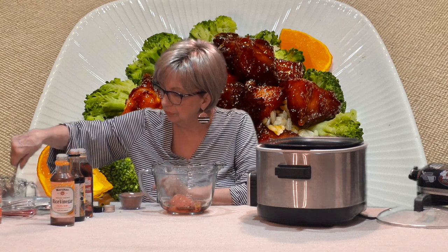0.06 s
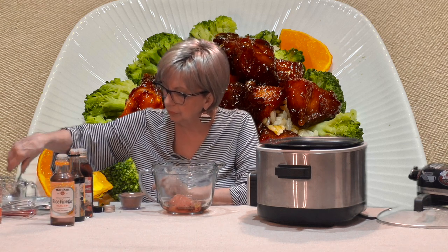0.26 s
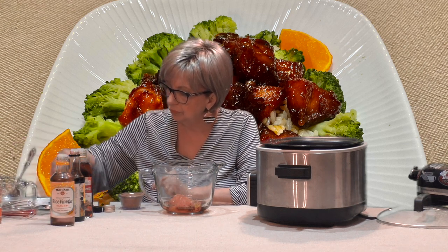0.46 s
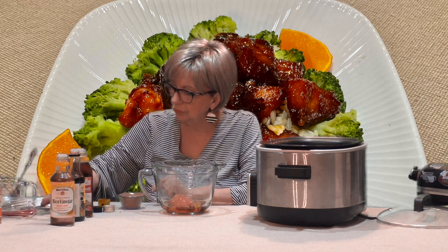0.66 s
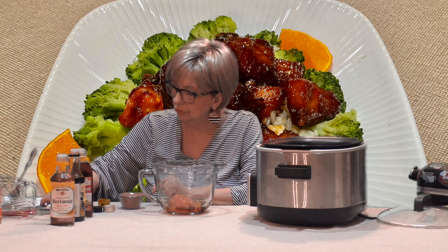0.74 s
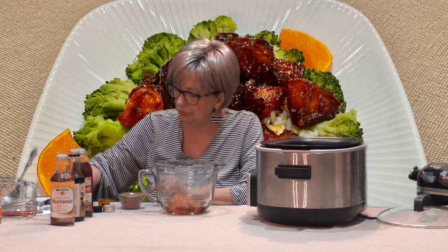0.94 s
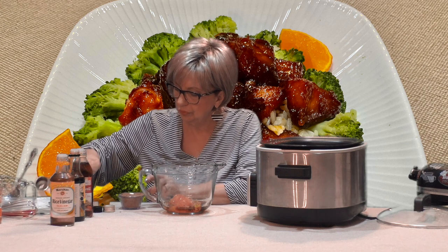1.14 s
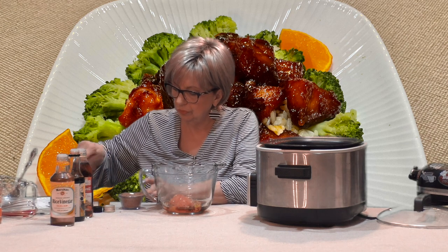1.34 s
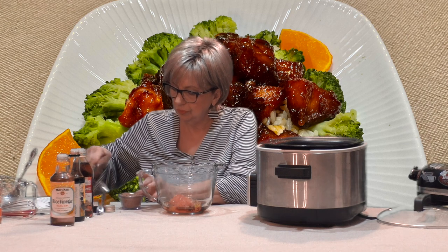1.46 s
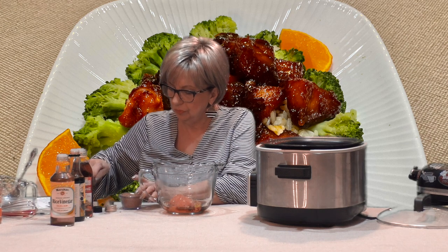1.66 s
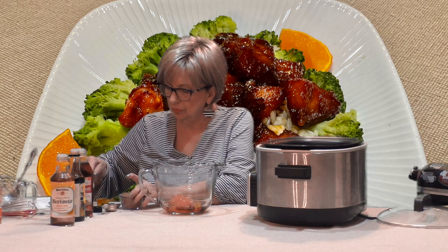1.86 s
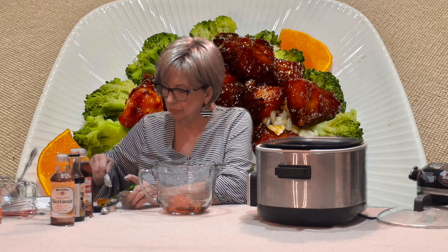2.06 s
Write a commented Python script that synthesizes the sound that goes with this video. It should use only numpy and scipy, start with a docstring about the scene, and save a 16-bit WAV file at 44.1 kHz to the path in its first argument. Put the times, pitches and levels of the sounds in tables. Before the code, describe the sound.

Metal spoons clinking: one rattles to rest in glass, others scrape, knock and ring among dishes

```python
"""Spoons in a kitchen

A spoon drops back into a glass jar on a counter and rattles to rest: filtered noise ticks over decaying modes.
Steel measuring spoons slide (granular friction noise), clack and ring among the dishes (damped modes), then settle.
Decaying stereo noise convolved with each contact gives the kitchen's echoes; a fan hums and rushes underneath."""
import sys
import numpy as np
from scipy import signal
from scipy.fft import rfft, irfft, next_fast_len
from scipy.io import wavfile
from scipy.ndimage import map_coordinates

SR = 44100
rng = np.random.default_rng(int(sys.argv[2]) if len(sys.argv) > 2 else 0)


def pcm_store(signal):
    """Save signal as 16-bit PCM."""
    levels = np.round(np.clip(np.atleast_2d(signal), -1, 1) * 32767)
    wavfile.write(sys.argv[1], SR, levels.astype(np.int16).T)


N = 92610  # length [samples]
BURST_S = 0.08  # length of each contact's noise [s]


def amp(db):
    """Level definition: decibels to an amplitude gain."""
    return 10 ** (np.asarray(db) / 20)


def unit(x):
    """Power normalization: scale to rms 1."""
    return x / np.sqrt(np.mean(x ** 2) + 1e-20)


def along(points, hz):
    """Logarithmic interpolation: read (frequency [Hz], value) points on a log-frequency axis."""
    f, v = np.transpose(points)
    return np.interp(np.log(hz + 1), np.log(f + 1), v)


def wobble(rate):
    """Random modulation: a smooth curve through random knots, rate knots a second."""
    return map_coordinates(rng.standard_normal(200), [np.arange(N) * rate / SR], mode="wrap")


def filtered(x, gain):
    """Minimum-phase filtering: the folded cepstrum makes the given gain(hz) causal."""
    n = x.shape[-1]
    m = 2 * next_fast_len(n // 2 + 4096)
    log_gain = np.log(np.maximum(gain(np.fft.rfftfreq(m, 1 / SR)), 1e-6))
    cepstrum = irfft(log_gain, m)
    cepstrum[..., 1:m // 2] *= 2
    cepstrum[..., m // 2 + 1:] = 0
    response = np.exp(rfft(cepstrum))
    return irfft(rfft(x, m) * response, m)[..., :n]


def soft(hz, corner_hz):
    """Contact stiffness: a softer contact loses the treble above its corner."""
    return 1 / np.sqrt(1 + (hz / corner_hz) ** 4)


def peak(hz, centre_hz, half_width_hz):
    """Resonance curve: 1 at the centre, 1/2 at the half-width."""
    return 1 / (1 + ((hz - centre_hz) / half_width_hz) ** 2)


def pair(alike, size):
    """Interchannel coherence: mixing mid and side noise makes two sides partly alike."""
    likeness = along(alike, np.fft.rfftfreq(size, 1 / SR))
    turn = np.arccos(np.clip(likeness, 0, 0.999)) / 2
    spectra = rfft(rng.standard_normal((2, size))) * [np.cos(turn), np.sin(turn)]
    mid, side = irfft(spectra, size)
    return np.array([mid + side, mid - side])


def add(track, s, sound):
    """Superposition: mix a sound into the track at s seconds."""
    part = track[:, round(s * SR):][:, :sound.shape[-1]]
    part += sound[..., :part.shape[-1]]


def burst(colour, t60, t):
    """Transient noise: exponentially decaying noise with the given spectrum, normalized to rms gain 1."""
    gain = lambda hz: unit(amp(along(colour, hz)))
    return filtered(rng.standard_normal(len(t)) * amp(-60 * t / t60), gain)


RING_ATTACK_S = 0.000063  # time constant
FLUTTER_HZ = 49.92  # knots per second: a loose, chattering contact makes each ring waver


def ring(hz, t60, times, levels_db, flutter_db, wander_rad):
    """Modal superposition: every blow adds to one decaying mode whose level and phase may waver."""
    kicks = np.bincount(np.round(times * SR).astype(int), amp(levels_db), minlength=N)[:N]
    decay, rise = amp(-60 / (t60 * SR)), np.exp(-1 / (RING_ATTACK_S * SR))
    level = signal.lfilter([1 - rise], np.poly([decay, rise]), kicks)
    flutter = amp(flutter_db * wobble(FLUTTER_HZ))
    phase = 2 * np.pi * hz * np.arange(N) / SR + wander_rad * wobble(FLUTTER_HZ)
    return level * flutter * np.sin(phase)


# left-right likeness of the echoes: (frequency [Hz], likeness [0-1])
ECHO_LIKENESS = [(500, 0.47), (2000, 0.59), (4000, 0.63), (7000, 1), (12000, 0.94)]
# reverberation time of the kitchen: (frequency [Hz], t60 [s])
KITCHEN_DECAY = [(300, 0.83), (2000, 0.47), (4000, 0.33), (8000, 0.36), (15000, 0.17)]
WALL_DELAY_S, WALL_BUILD_S = 0.0024, 0.001  # first echo, and the linear build-up after it


def kitchen(x):
    """Statistical reverberation: convolution with decaying stereo noise whose treble dies first."""
    hz, t, z = signal.stft(pair(ECHO_LIKENESS, size=SR // 2), SR, nperseg=256)
    decay = amp(-60 * t / along(KITCHEN_DECAY, hz)[:, None])
    tail = signal.istft(z * decay, SR, nperseg=256)[1]
    tail_t = np.arange(tail.shape[1]) / SR
    tail = tail * np.clip((tail_t - WALL_DELAY_S) / WALL_BUILD_S, 0, 1)
    tail = tail / np.linalg.norm(tail[0])  # the left tail has unit energy
    return signal.fftconvolve(x[None], tail, axes=1)[:, :N]


# spectrum of the rushing air: (frequency [Hz], relative density [dB])
AIR_COLOUR = [(20, -27), (45, -3.5), (70, 0), (100, 2.5), (170, -1), (260, -0.5), (390, 1), (480, -3.5),
              (620, -13.5), (800, -17.5), (1000, -11), (1500, -12), (2200, -17), (3500, -22), (6000, -31),
              (10000, -27), (15500, -25.5)]
# left-right likeness of the air: (frequency [Hz], likeness [0-1])
AIR_LIKENESS = [(40, 1), (150, 0.46), (350, 0.91), (2000, 0.42), (8000, 0.82)]
# lines of the fan: (frequency [Hz], rms level before wavering [dB])
FAN_LINES = [(366, -55.5), (425.5, -51.5)]
AIR_DB = -41.5  # rms


def fan():
    """Broadband flow noise with tonal lines: low rush, faint hiss and two slightly unsteady tones."""
    t = np.arange(N) / SR
    air = unit(filtered(pair(AIR_LIKENESS, size=N), lambda hz: amp(along(AIR_COLOUR, hz))))
    hum = np.zeros(N)
    for hz, db in FAN_LINES:
        level = np.sqrt(2) * amp(db + 4.4 * wobble(rate=7.6))
        hum += level * np.sin(2 * np.pi * hz * t + 0.5 * wobble(rate=8.23))
    return amp(AIR_DB) * air + hum


# spoon rubbing on glass, a faint hollow note: (centre time [s], Gaussian length [s], level [dB], pitch [Hz])
RUBS = [(0.05, 0.03, -42.5, 1007), (0.13, 0.022, -38, 1018), (0.392, 0.01, -41, 980),
        (0.493, 0.013, -35.5, 990), (0.58, 0.041, -48.5, 960), (0.767, 0.048, -46.5, 937),
        (0.913, 0.0092, -43, 1014)]
RUB_HALF_WIDTH_HZ = 45


def rubbing():
    """Frictional excitation of a resonance: narrow noise swells as the spoon drags on the glass."""
    t = np.arange(N) / SR
    out = np.zeros(N)
    for s, length, db, pitch_hz in RUBS:
        note = filtered(rng.standard_normal(N), lambda hz: peak(hz, pitch_hz, RUB_HALF_WIDTH_HZ))
        out += unit(note) * amp(db) * np.exp(-((t - s) / length) ** 2)
    return out


# spoon against jar: (time [s], glass ring [dB], spoon ring [dB], tick [dB], treble corner [Hz],
# place [0 bottom to 1 rim])
JAR_BLOWS = [(0.1152, -29, -32.5, -24, 4380, 0), (0.1185, -46, -22, -21, 10000, 0.15),
             (0.2768, -15.5, -38, -12.5, 12000, 0.12), (0.2795, -16.5, -40, -10, 14200, 0.14),
             (0.2915, -23.5, -49, -27, 15000, 0), (0.301, -32, -32, -15.5, 10000, 0),
             (0.312, -32, -37, -24, 5160, .2), (0.363, -40, -42, -36, 5060, 1),
             (0.378, -30, -26.5, -37, 7000, 0.9), (0.421, -41, -60, -28.5, 5000, 0),
             (0.481, -44, -37, -37, 5900, 0.99), (0.565, -36.5, -65, -30.5, 4930, 1),
             (0.571, -37, -36.5, -31, 4900, 1)]
# modes of the glass jar: (frequency [Hz], level struck at bottom [dB], level struck at rim [dB], t60 [s])
JAR_MODES = [(1010, -10, -8, 0.059), (2062, 0.5, -13, 0.25), (2114, -7, -18, 0.41), (2143, -13, -9, .28),
             (2650, -19, 4, 0.14), (2680, -18, -6.5, 0.24), (3601, -16, -20, 0.34), (4745, -13, -3, 0.098),
             (5372, -9, -17, 0.4), (5910, -16, -6, 0.27), (6470, -17, -29, 0.21), (7360, -13.5, -27, 0.22),
             (8253, -7, -18, 0.24), (9580, -7, -10, 0.14), (10090, 5.5, -16, 0.052),
             (10240, -6.5, -28, 0.16), (11200, -15.5, -14, 0.25), (12630, -15, -22, 0.2),
             (14500, -12, -26, .15)]
# modes of the spoon in the jar: (frequency [Hz], level [dB], t60 [s])
SPOON_MODES = [(1730, -16, 0.42), (2262, -6.5, 0.19), (2285, 6.5, 0.06), (2976, -4, 0.13), (5370, -5, 0.32),
               (3506, -10, .25), (4700, -10, 0.11), (6560, -17, 0.16), (9400, -21, 0.14), (11500, -19, 0.1),
               (12680, -4, 0.033)]
# spectrum of steel ticking on glass: (frequency [Hz], relative level [dB])
TICK_COLOUR = [(100, -50), (400, -29), (740, -16.5), (980, -5.5), (1500, -1.5), (2200, 8), (3200, 3),
               (4200, 0.5), (5400, 6.5), (7200, -6.5), (10000, -8), (12500, -2), (15500, -13)]
TICK_T60_S = 0.026
TICK_PEAK_DB, TICK_HALF_WIDTH_HZ = 1.5, 98  # the glass and the spoon colour the tick around their modes


def jar(tick_room_db, ring_room_db):
    """Modal excitation: contacts tick and ring glass and spoon; the place struck weights the glass modes."""
    out, t = np.zeros((2, N)), np.arange(int(BURST_S * SR)) / SR
    times, glass_db, spoon_db, ticks_db, corners_hz, place = np.transpose(JAR_BLOWS)
    for s, db, corner_hz in zip(times, ticks_db, corners_hz):
        noise = burst(TICK_COLOUR, TICK_T60_S, t)
        tick = amp(db) * filtered(noise, lambda hz: soft(hz, corner_hz) * tick_colour(hz))
        add(out, s, tick)
        add(out, s, amp(tick_room_db) * kitchen(tick))
    dull_db = lambda hz: 20 * np.log10(soft(hz, corners_hz))
    rings = np.zeros(N)
    for hz, bottom_db, rim_db, t60 in JAR_MODES:
        levels_db = glass_db + np.interp(place, [0, 1], [bottom_db, rim_db]) + dull_db(hz)
        rings += ring(hz, t60, times, levels_db, flutter_db=3, wander_rad=1.0)
    for hz, db, t60 in SPOON_MODES:
        rings += ring(hz, t60, times, spoon_db + db + dull_db(hz), flutter_db=1, wander_rad=0.97)
    return out + rings + amp(ring_room_db) * kitchen(rings)


def tick_colour(hz):
    """Resonant radiation: the tick keeps full level at jar and spoon modes and loses a little between."""
    modes_hz = np.array([row[0] for row in JAR_MODES + SPOON_MODES])
    near = np.max(peak(hz, modes_hz[:, None], TICK_HALF_WIDTH_HZ), axis=0)
    return amp(TICK_PEAK_DB * (near - 1.0))


# measuring spoons knocking: (time [s], clack [dB], bright scrape [dB], clack pitch [Hz])
CLACKS = [(0.628, -19.5, -28, 4364), (0.633, -20.5, -33, 4316), (1.514, -9, -49, 3430),
          (1.5175, -20, -28, 3240), (1.5274, -10.5, -42, 3230), (1.529, -21, -40, 3610),
          (1.535, -6.5, -15.5, 3384), (1.5375, -21, -14.5, 3280), (1.5424, -15.5, -30, 3660),
          (1.555, -41, -43, 3400), (1.569, -27, -35, 3370), (1.582, -38, -23.5, 3430),
          (1.711, -17.5, -40, 2820), (1.7157, -7, -23.5, 3466), (1.7392, -15.5, -34, 3380),
          (1.777, -27, -53, 3600), (1.821, -16, -36, 3114), (1.9857, -22, -38, 3280),
          (2.0386, -22.5, -40.5, 3240)]
# short resonances of the clack: (ratio to its pitch, level [dB], t60 [s])
CLACK_BODY = [(.39, -37, 0.013), (.56, -15, 0.017), (.82, -13, 0.0047), (0.942, -1.5, 0.017),
              (1.029, 3.5, 0.018), (1.129, -2.5, 0.018), (1.36, -15.5, 0.023)]
# spectrum of the clack's noise: (frequency [Hz], relative level [dB])
CLACK_NOISE = [(800, -15), (1150, -5), (2300, 3.5), (3600, 6), (5000, -7), (8000, -20.5), (15500, -35)]
# spectrum of the bright scrape: (frequency [Hz], relative level [dB])
SCRAPE_COLOUR = [(300, -37), (1000, -1), (2500, -5.5), (4400, 6), (5600, 1), (7400, -2), (11000, -2),
                 (15500, -5.5)]
# small steel parts radiate little bass: (frequency [Hz], gain [dB])
LOW_CUT = [(100, -30), (500, -12), (820, -9.5), (1120, 1)]
CLACK_NOISE_DB = -1.5  # noise gain beside the body
CLACK_ATTACK_S, CLACK_T60_S, SCRAPE_T60_S = 0.00048, 0.022, 0.026  # attack is a time constant


def clacks(clack_room_db, scrape_room_db):
    """Impact of small bodies: heavily damped resonances and noise, with a short bright scrape."""
    out, t = np.zeros((2, N)), np.arange(int(BURST_S * SR)) / SR
    contact = 1 - np.exp(-t / CLACK_ATTACK_S)
    thin = lambda hz: amp(along(LOW_CUT, hz))
    for s, clack_db, scrape_db, pitch_hz in CLACKS:
        body = np.zeros(len(t))
        for ratio, db, t60 in CLACK_BODY:
            level = amp(db + 0.76 * rng.standard_normal() - 60 * t / t60)  # each knock varies a little
            body += level * np.sin(2 * np.pi * ratio * pitch_hz * t)
        noise = amp(CLACK_NOISE_DB) * burst(CLACK_NOISE, CLACK_T60_S, t)
        clack = amp(clack_db) * filtered(contact * (body + noise), thin)
        scrape = amp(scrape_db) * filtered(burst(SCRAPE_COLOUR, SCRAPE_T60_S, t), thin)
        add(out, s, clack + scrape)
        add(out, s, kitchen(amp(clack_room_db) * clack + amp(scrape_room_db) * scrape))
    return out


# blows that leave the measuring spoons ringing: (time [s], level [dB], treble corner [Hz])
STEEL_BLOWS = [(0.628, -34, 20200), (1.538, -14.5, 15000), (1.567, -19.5, 5500), (1.7165, -26, 12000),
               (1.983, -36, 3980), (2.04, -41, 3580)]
# modes of the measuring spoons: (frequency [Hz], level [dB], t60 [s])
STEEL_MODES = [(2770, -14, 0.14), (3366, -1.5, 0.44), (3330, -21, 0.13), (4080, -7, 0.46),
               (4720, -15, 0.17), (5900, -25, 0.67), (7235, -14.5, 0.51), (9255, -7, 0.26),
               (10810, 2, 0.044)]
# fingers damp the ringing until the next knock: the level ramps down, holds, then ramps back up
GRIP_S, GRIP_END_S, GRIP_DB, GRIP_DB_PER_S = 1.63, 1.716, 6, 300


def steel_ring(room_db):
    """Free vibration of steel: a clear modal ring, lowered in level while the spoons are gripped."""
    t = np.arange(N) / SR
    times, blow_db, corners_hz = np.transpose(STEEL_BLOWS)
    tone = np.zeros(N)
    for hz, db, t60 in STEEL_MODES:
        levels_db = blow_db + db + 20 * np.log10(soft(hz, corners_hz))
        tone += ring(hz, t60, times, levels_db, flutter_db=0, wander_rad=0.4)
    released_s = GRIP_END_S + GRIP_DB / GRIP_DB_PER_S
    grip_db = np.clip(np.minimum(t - GRIP_S, released_s - t) * GRIP_DB_PER_S, 0, GRIP_DB)
    tone = tone * amp(-grip_db)
    return tone + amp(room_db) * kitchen(tone)


# sliding strokes: (start [s], rise [s], fall t60 [s], level [dB], treble corner [Hz], scrape centre [Hz])
SLIDES = [(0.785, 0.061, 0.4, -35.5, 11100, 3940), (0.869, 0.013, 0.19, -29, 15100, 5300),
          (0.906, 0.017, 0.086, -29, 9900, 4750), (0.95, 0.011, 0.18, -33.5, 6000, 5120),
          (1.032, 0.024, 0.16, -38.5, 6200, 3800), (1.35, 0.023, 0.18, -43.5, 6330, 4750)]
# spectrum of the sliding: (frequency [Hz], relative level [dB])
SLIDE_COLOUR = [(100, -40), (700, -12), (950, -12.5), (1500, -5), (2200, -0.5), (3000, -1), (3900, 2),
                (5000, -1.5), (6200, -1), (9000, -4.5), (12000, -2), (15500, -5)]
# resonances that the grains excite: (frequency [Hz], half-width [Hz], boost [dB])
SLIDE_PEAKS = [(2090, 55, 8), (2640, 62, 3.7), (5140, 54, 10), (9200, 100, 3.8), (10750, 220, 4.9)]
GRAINS_PER_S, SLIDE_SMOOTH = 350, 1  # SLIDE_SMOOTH: steady noise relative to the grains' rms
SCRAPE_PEAK_DB, SCRAPE_HALF_WIDTH_HZ = 7.5, 280
CHATTER_DB, CHATTER_HZ = 2, 69  # the sliding catches and lets go; CHATTER_HZ in knots per second


def sliding(room_db):
    """Granular friction: random fine impacts and steady noise make the steel tinkle in short strokes."""
    out, t = np.zeros((1, N)), np.arange(SR // 2) / SR

    def colour(hz):
        """Source-filter principle: the sliding spectrum raised at the steel's resonances."""
        boost_db = sum(db * peak(hz, centre, width) for centre, width, db in SLIDE_PEAKS)
        return amp(along(SLIDE_COLOUR, hz) + boost_db)

    for start, rise, t60, db, corner_hz, centre_hz in SLIDES:
        scrape = lambda hz: amp(SCRAPE_PEAK_DB * peak(hz, centre_hz, SCRAPE_HALF_WIDTH_HZ))
        grains = unit((rng.random(len(t)) < GRAINS_PER_S / SR) * rng.standard_normal(len(t)))
        friction = grains + SLIDE_SMOOTH * rng.standard_normal(len(t))
        friction = friction * amp(CHATTER_DB * wobble(CHATTER_HZ)[:len(t)])
        rub = unit(filtered(friction, lambda hz: colour(hz) * scrape(hz) * soft(hz, corner_hz)))
        swell = np.minimum(t / rise, 1) ** 0.89
        fall = amp(db - 60 * np.maximum(t - rise, 0) / t60)
        add(out, start, rub * swell * fall)
    return out + amp(room_db) * kitchen(out[0])


# level of the left side over the right: (frequency [Hz], difference [dB])
LEFT_OVER_RIGHT = [(200, -6.5), (1000, 2.5), (3500, 2.5), (5500, -0.7), (12000, 1)]


def scene():
    """Interaural level difference: the utensils' stereo balance varies with frequency, over the fan."""
    utensils = rubbing() + jar(tick_room_db=6, ring_room_db=-7.5)
    utensils = utensils + clacks(clack_room_db=-2, scrape_room_db=3.5)
    utensils = utensils + steel_ring(room_db=-13.5) + sliding(room_db=-3)
    balance = lambda hz: amp(np.outer([0.5, -0.5], along(LEFT_OVER_RIGHT, hz)))
    return filtered(utensils, balance) + fan()


TOP_HZ = 15800  # band limit


def record(dry):
    """Clipping and band limitation: peaks stop at full scale, then all above the band limit is removed."""
    m = next_fast_len(N + SR // 2)
    spectrum = rfft(np.clip(dry, -1, 1), m)
    kept = np.fft.rfftfreq(m, 1 / SR) < TOP_HZ
    return irfft(spectrum * kept, m)[:, :N]


dry = scene()
out = record(dry)
pcm_store(out)
```